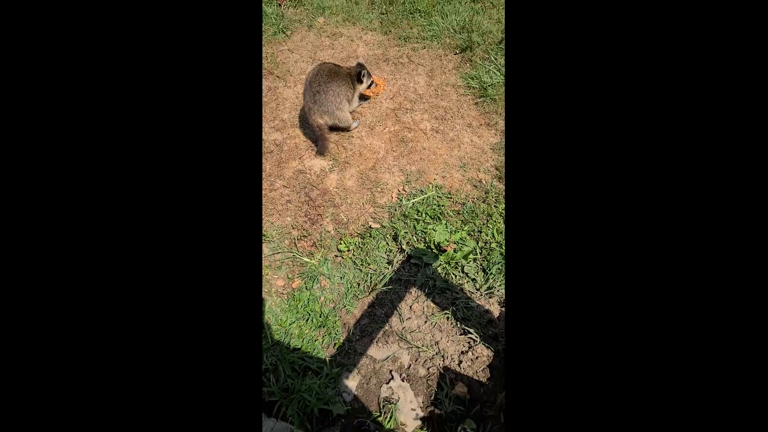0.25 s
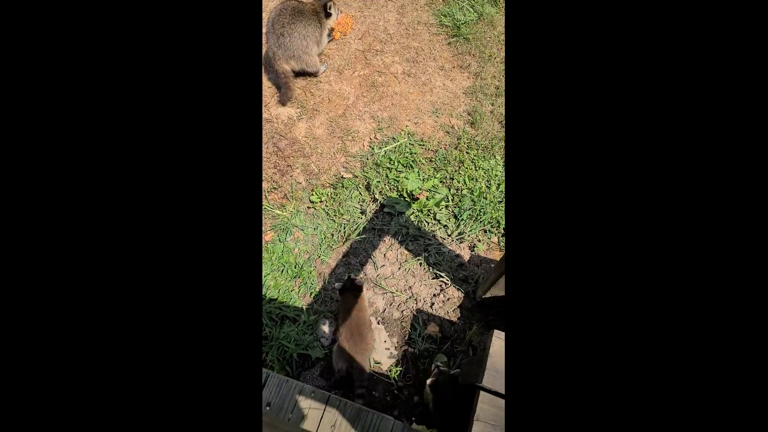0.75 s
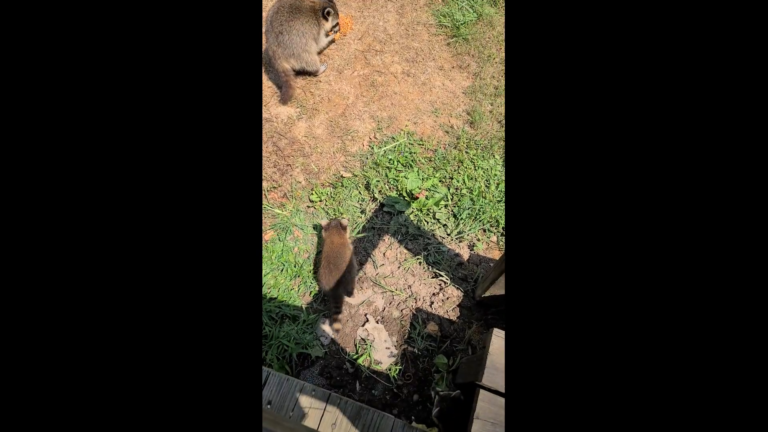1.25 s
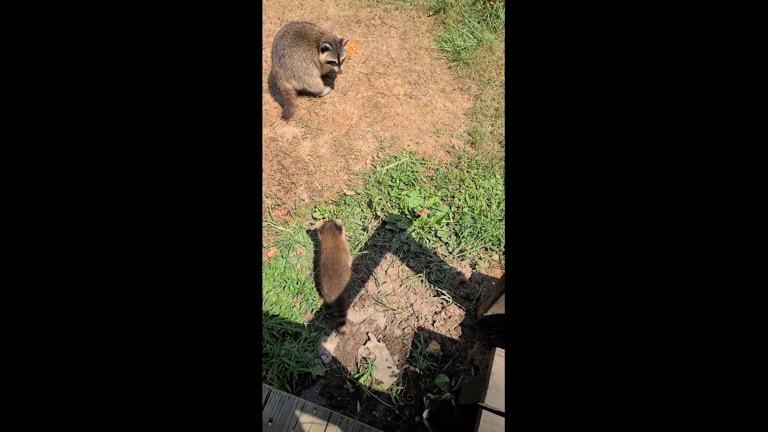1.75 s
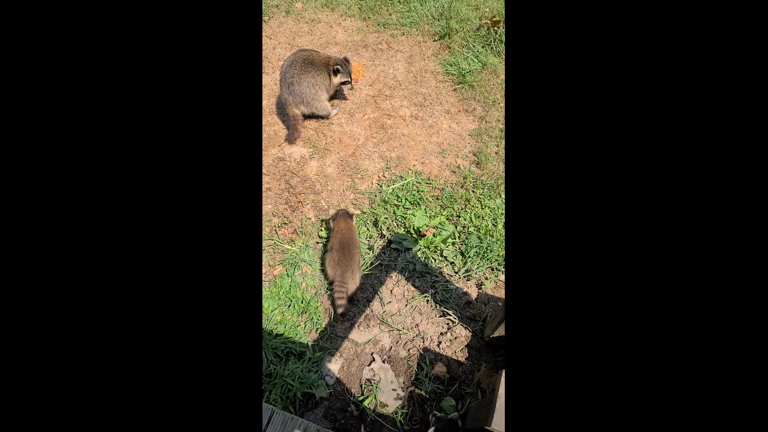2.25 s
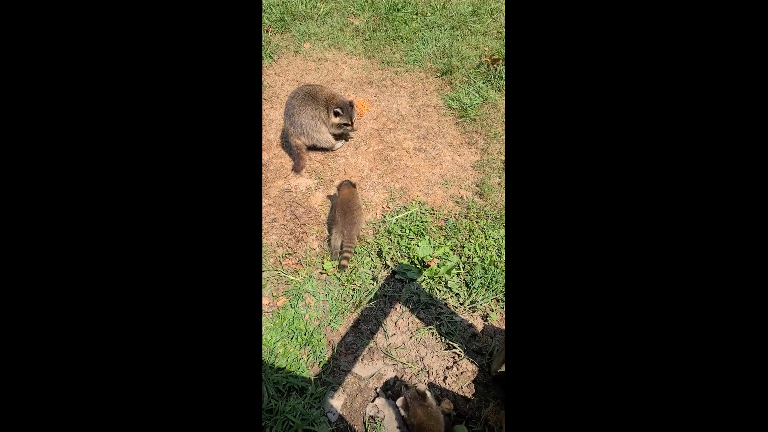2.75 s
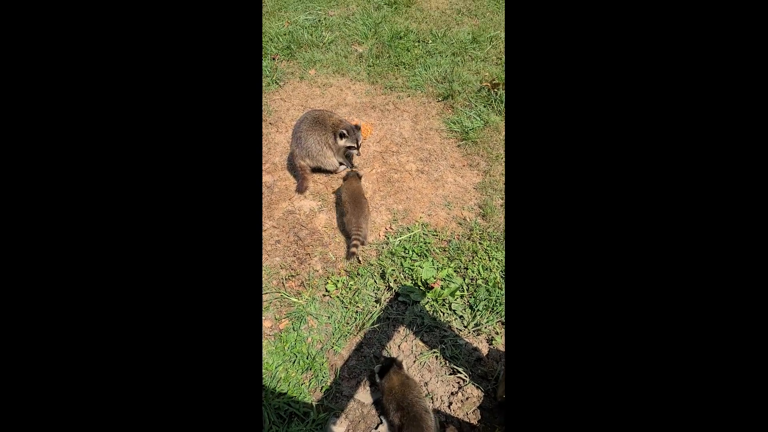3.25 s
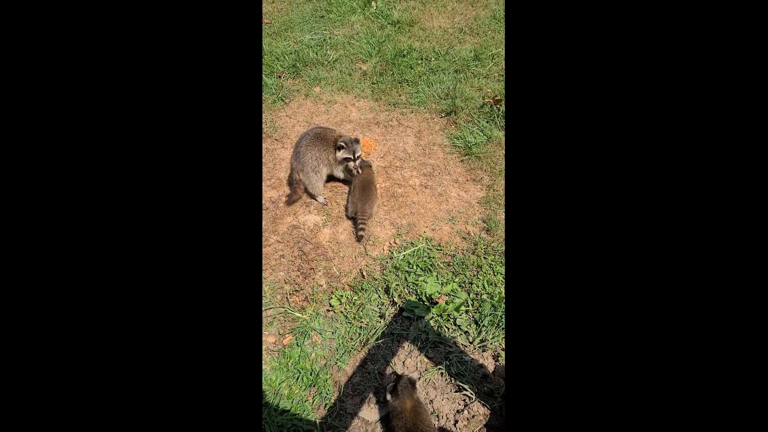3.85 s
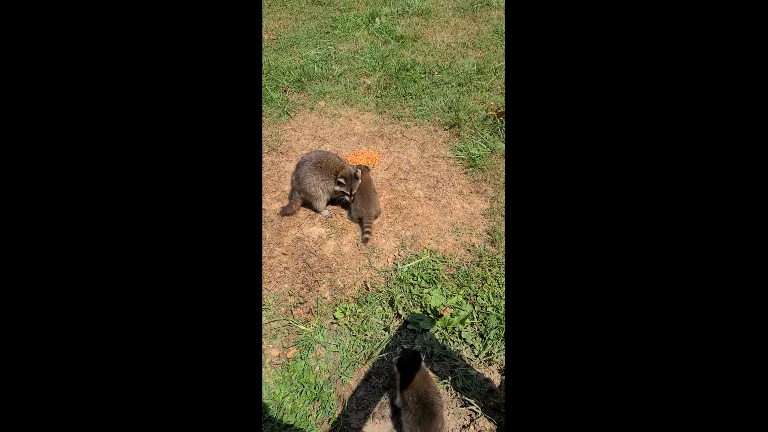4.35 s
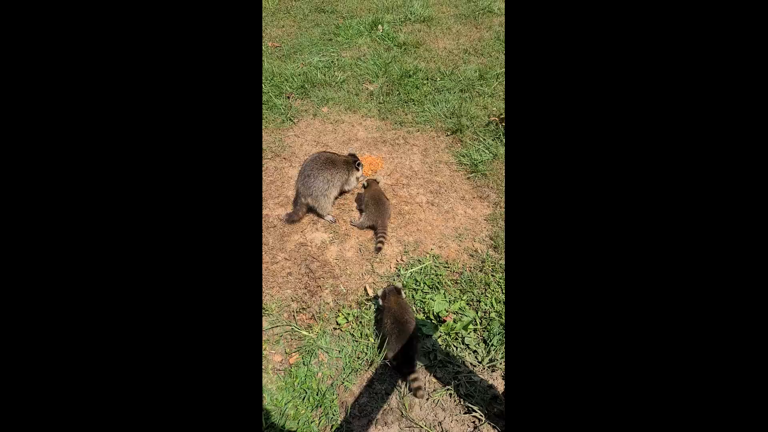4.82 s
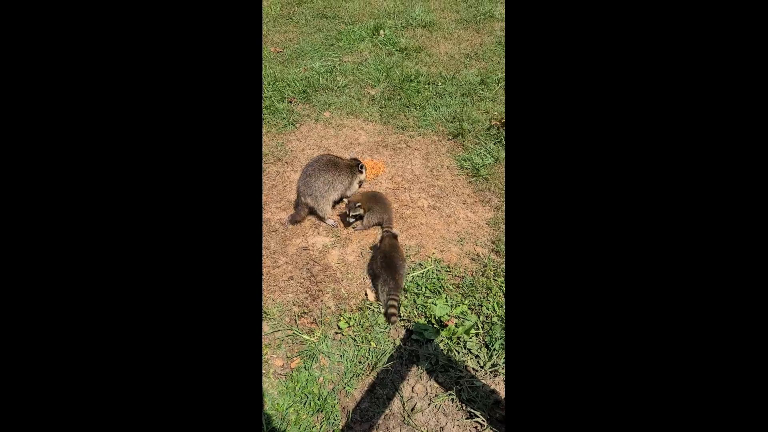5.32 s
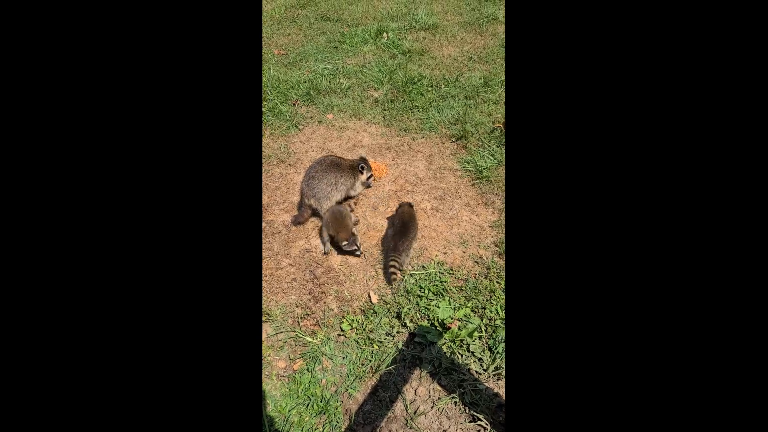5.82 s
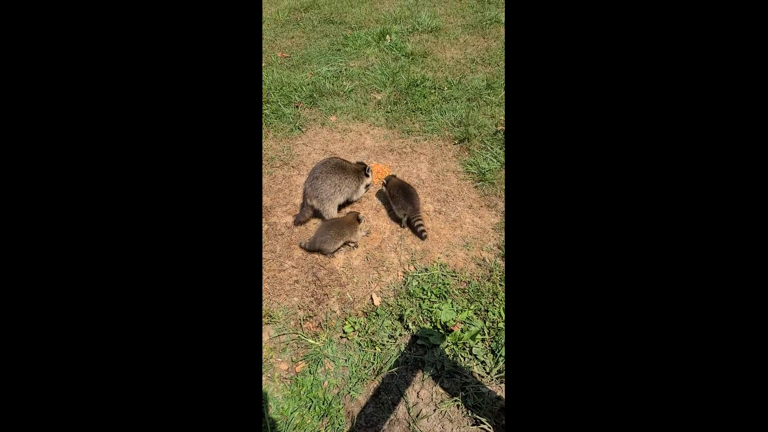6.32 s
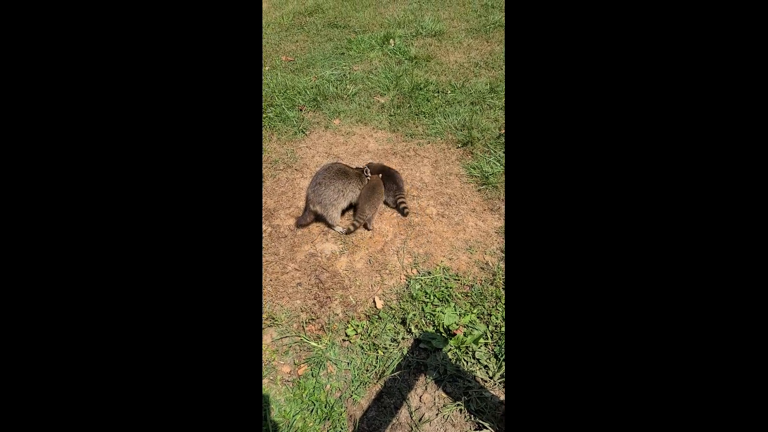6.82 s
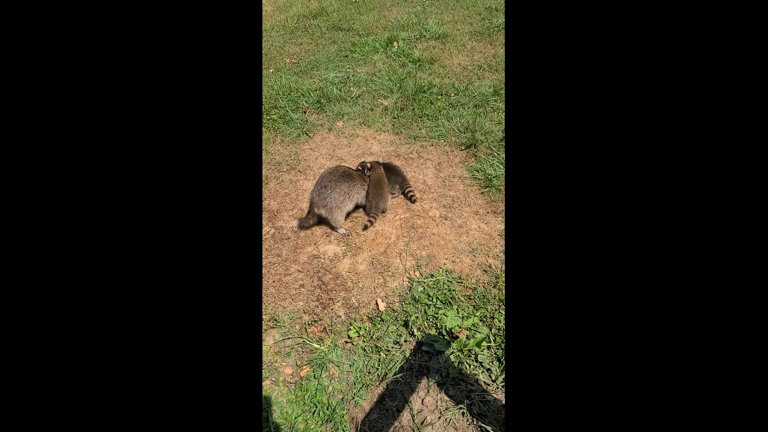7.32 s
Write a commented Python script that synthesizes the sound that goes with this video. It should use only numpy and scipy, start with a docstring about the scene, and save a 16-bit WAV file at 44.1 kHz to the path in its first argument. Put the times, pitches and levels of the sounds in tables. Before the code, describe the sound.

In an open yard, a young raccoon calls in a fast, buzzy trill of tiny squeaks, then a low, dry churr, then a second, longer trill. Sparse hoarse chucks and short squeaks follow. Low wind rumble buffets the handheld microphone throughout, heavier near the end. Faint bird notes, light grass crackles and paw scuffs sit behind, with a soft echo from trees.

```python
"""A lawn below a deck, among echoing trees: raccoon kits follow their mother past a camera.
Harmonic tones with bursts of filtered noise make their squeaks, in two long trills, short bouts or singly;
noise bursts in throat resonances make hoarse chucks. Grass crackles as grainy noise, birds whistle as gliding
sines, dull thuds and a pulsing insect buzz are shaped noise, and breeze noise rumbles on both ports."""
import sys
import numpy as np
from scipy import signal
from scipy.fft import rfft, irfft, next_fast_len
from scipy.io import wavfile
from scipy.ndimage import uniform_filter1d, map_coordinates

SR = 44100
rng = np.random.default_rng(int(sys.argv[2]) if len(sys.argv) > 2 else 0)


def store_pcm(level_fs):
    """Save levels as 16-bit WAV."""
    pcm = np.round(np.clip(level_fs, -1, 1) * 32767).astype(np.int16)
    wavfile.write(sys.argv[1], SR, np.atleast_2d(pcm).T)


N = 334278

# Levels are relative: later gains and filters act on them. Spreads are the sigma of a bell curve.
# rhythm of each trill: first_s, end_s, gap_s, slowing_per_s2, squeak_length_s
TRILL_RHYTHMS = [(0.6843, 1.55, .04362, .120, 0.0059), (3.4238, 4.5, .04408, .0415, 0.0077)]
# voice through each trill: time_s, pitch_hz, level_db, second_harmonic_db, third_harmonic_db,
# roughness (0-1), lead_in_db
TRILL_VOICES = [
    [(.685, 1120, -30.5, -23, -32, 0.83, -5.5), (.74, 1273, -25, -10, -28.5, .42, -7.5),
     (.9, 1273, -22.5, -8, -18, 0.08, -5), (1.04, 1341, -21.5, -7, -16.5, 0.12, -6),
     (1.085, 1397, -28, -11, -26, 0.57, -4.5), (1.13, 1289, -23, -5.5, -15.5, 0.45, -12),
     (1.225, 1248, -21.5, -4.5, -12.5, 0.4, -5), (1.31, 1225, -25, -8.5, -27, 0.77, -3.5),
     (1.39, 1056, -39, -19, -20, 0.5, -12), (1.525, 995, -32.5, -9, -22, 0.45, -10)],
    [(3.426, 1293, -28.5, -20, -32, 0.15, -17), (3.515, 1290, -25.5, -19, -30, .22, -7.5),
     (3.6, 1268, -24.5, -9, -18, 0.29, -7.5), (3.73, 1285, -22, -8.5, -17, 0.1, -13),
     (3.86, 1282, -24.5, -7, -16.5, 0.13, -8.5), (4.05, 1268, -21, -3, -14.5, 0.12, -14),
     (4.19, 1268, -20.5, -3.5, -15, .2, -16), (4.245, 1303, -21.5, -3.5, -16, 0.22, -1.5),
     (4.29, 1214, -27.5, -8, -28, 0.68, -9), (4.34, 1204, -25, -7, -24, 0.48, -7),
     (4.386, 1267, -19.5, -9, -25.5, 0.4, -16), (4.476, 1170, -32, -8.5, -35, 0.8, -6.5)],
]
# separately timed squeaks, single or in short bouts, one of them during the first trill:
# time_s, pitch_hz, level_db, second_harmonic_db, roughness (0-1)
TIMED_SQUEAKS = [(1.475, 1753, -28.5, -38, 0.1), (3.342, 1900, -23.5, -35.5, 0.07),
                 (5.566, 953, -31, -29, 0.33), (5.612, 1014, -27, -22, 0.28),
                 (5.657, 1050, -26.5, -11.5, 0.5), (5.707, 1043, -25, -16, 0.16),
                 (5.959, 1010, -33.5, -16, .3), (6.011, 1046, -28, -19.5, 0.2),
                 (6.51, 978, -37.5, -17, 0.15), (6.547, 1140, -41.5, -18, .25),
                 (6.592, 1146, -32.5, -9, 0.38), (6.846, 1047, -33, -28, 0.08)]
# colour of the squeaks' throat: frequency_hz, gain_db
THROAT_COLOUR = [(600, -20), (820, -14.5), (980, 0), (1200, -0.5), (1700, -6), (1950, -5), (2150, -3.5),
                 (2600, -2), (3100, -1.5), (3800, -2), (5100, -1.5), (6000, 6), (9000, 1.5)]
# random spread between trill squeaks: level in dB, pitch as a fraction, length as a log ratio
SCATTER_DB, SCATTER_PITCH, SCATTER_LENGTH = 0.86, 0.01187, 0.089
LEAD_S, TIMED_LENGTH_S = 0.015, 0.0059  # lead-in ahead of a squeak; base length of a timed squeak
THIRD_DROP_DB = 11.5  # a timed squeak's third harmonic under its second
# separately timed hoarse chucks, single, in short groups or leading into squeaks:
# time_s, main_resonance_hz, level_db, upper_level_db
SINGLE_TIMED_CHUCKS = [(0.633, 650, -49, -51), (0.754, 830, -41.5, -43.5), (1.355, 1080, -57, -49),
                       (1.405, 1080, -57, -51), (1.455, 1040, -52, -48), (1.575, 1620, -52, -55),
                       (2.849, 706, -43, -63), (2.887, 845, -43, -59.5), (2.927, 625, -43, -73),
                       (3.016, 1020, -53.5, -72), (3.325, 714, -44, -62), (3.359, 1430, -40.5, -62),
                       (3.401, 1220, -44.5, -47), (3.687, 630, -40, -52), (3.916, 530, -44.5, -57),
                       (4.491, 587, -47.5, -53), (4.537, 577, -41, -65), (4.774, 594, -47, -71),
                       (4.823, 780, -44, -55.5), (5.532, 676, -38, -68), (5.648, 640, -39, -67),
                       (5.698, 680, -40.5, -60), (5.739, 605, -42.5, -63), (5.921, 715, -40, -54),
                       (6.04, 630, -50.5, -65), (6.625, 746, -57, -70), (6.723, 825, -54, -72),
                       (6.806, 663, -43, -75), (6.895, 592, -47, -55), (7.558, 800, -45, -73)]
# rhythm of a run of chucks: first_s, end_s, gap_s, slowing_per_s2
CHURR_RHYTHM = (2.075, 2.5, .0385, .3)
# throat through that run: time_s, main_resonance_hz, level_db, upper_level_db
CHURR_RESONANCES = [(2.08, 650, -52.5, -55), (2.115, 920, -52.5, -51), (2.155, 1134, -34, -43),
                    (2.27, 1230, -36, -41), (2.31, 675, -40, -38), (2.35, 720, -43, -49.5),
                    (2.48, 657, -39, -47)]
# direction of the calling kit: time_s, left_minus_right_db, left_lead_ms
KIT_DIRECTION = [(.7, 5, 0.14), (1.3, 4, 0.14), (1.5, 0.5, 0.14), (2.4, 3, 0.13), (3.5, 4, -0.079),
                 (3.9, 2, -0.055), (4.2, 1, -0.069), (4.45, 5.5, -0.053), (5.7, 3, 0.13), (6.8, 1.5, 0.17)]
# extra level difference between the ports: frequency_hz, left_minus_right_db
PORT_SHADOW = [(600, -4), (1300, -0.5), (2600, 6), (3900, 41), (7000, 30.5)]
# reverberation from the trees: frequency_hz, t60_s
TREE_DECAY = [(500, 0.24), (3000, 0.57), (8000, 1)]
# reverberation from the deck: frequency_hz, t60_s
DECK_DECAY = [(300, 0.31), (1500, 0.055), (8000, 0.13)]
# bird notes: start_s, length_s, first_hz, held_hz, slide_time_constant_s, level_db, swell_db
BIRD_NOTES = [(1.604, 0.045, 3050, 3020, .02, -46, 2), (1.645, 0.026, 2476, 2390, .02, -46.5, 2),
              (1.684, 0.073, 2320, 1946, .006, -47, 0), (1.695, 0.18, 2465, 2445, .03, -56, -6),
              (1.764, 0.11, 2990, 2950, .04, -49, -10), (1.748, .13, 5060, 5960, .03, -67, -3),
              (1.778, .19, 7560, 7870, .03, -66.5, 5), (1.789, .15, 8600, 8900, .07, -66.5, 3),
              (1.992, 0.27, 7150, 6760, .015, -68, 0), (2.123, 0.1, 5250, 6080, .018, -63, -4),
              (2.16, 0.097, 7700, 8100, .06, -65, 5), (4.44, .14, 7650, 8150, .08, -61, 1),
              (4.449, 0.44, 6530, 6030, .12, -70, -6), (4.745, .1, 7600, 8200, .06, -68, 3),
              (6.255, 0.117, 3900, 3790, .06, -51.5, 12), (6.37, 0.145, 3790, 3785, 0.047, -59, 0),
              (6.36, .26, 3650, 2148, 0.014, -52, -13), (6.529, 0.3, 3520, 3410, .04, -52, 1)]
# one throbbing bird note: length_s, first_hz, held_hz, slide_time_constant_s, level_db, swell_db
THROBBING_NOTE = (0.21, 2848, 2989.5, 0.1, -43.5, -3)
THROB_START_S, THROB_HZ = 6.55, 24.5
# bodies brushing through grass: time_s, level_db, spread_s
GRASS_BRUSHES = [(.23, -63.5, 0.065), (1.0, -64, 0.072), (1.22, -73, 0.059), (2.28, -62.5, 0.017),
                 (2.7, -72, 0.33), (3.9, -69, 0.22), (4.48, -63, 0.055), (4.86, -64.5, 0.082),
                 (5.385, -58, 0.016), (5.71, -62, 0.072), (5.97, -63, 0.036), (6.7, -74, .4)]
# dry stalks snapping: time_s, level_db
STALK_SNAPS = [(0.2389, -50), (0.2708, -51), (1.068, -52), (2.483, -49.5), (2.6125, -54), (3.685, -45),
               (3.7354, -45), (4.4488, -55), (5.3692, -51), (5.7022, -46), (5.742, -43), (5.8336, -51),
               (5.9504, -49)]
# paws scraping dirt: time_s, level_db, spread_s
DIRT_SCUFFS = [(.25, -59.5, 0.046), (4.903, -52.5, 0.029)]
# spectrum of dry stalks: frequency_hz, density_db_per_hz
STALK_SPECTRUM = [(800, -34), (2500, -7), (5000, 3), (7000, -5), (8500, 4), (11000, -1.5), (15500, -2)]
# spectrum of scraped dirt: frequency_hz, density_db_per_hz
DIRT_SPECTRUM = [(300, -2.5), (900, -4), (2000, -5), (3200, 0), (4500, -15.5), (8000, -21), (15000, -19)]
# dull thuds: time_s, level_db, spread_s
THUD_TIMES = [(2.01, -48, 0.02), (2.26, -52, 0.022), (2.45, -56, 0.044)]
# spectrum of a thud: frequency_hz, density_db_per_hz
THUD_SPECTRUM = [(120, -20), (230, -3), (380, 3.5), (520, -14), (900, -42)]
# spectrum of the insects: frequency_hz, density_db_per_hz
INSECT_SPECTRUM = [(7500, -40), (9000, -8.5), (9500, -12.0), (11000, -32.0)]
# breeze on each port: time_s, left_db, right_db
BREEZE_LEVELS = [(0, -35, -30), (.35, -37, -33.5), (.7, -43, -48), (.85, -44, -41), (1.2, -46, -53.5),
                 (1.45, -37, -43), (1.8, -39, -44.5), (2.5, -39, -32.5), (2.85, -42, -32.5),
                 (3.2, -35, -29), (3.4, -40.5, -41.5), (3.7, -38.5, -32.5), (4.55, -39, -32.5),
                 (4.8, -42, -46), (5.1, -39, -48), (5.45, -35, -30.5), (5.7, -38, -36.5), (6.3, -29, -26.5),
                 (6.65, -42, -32), (7.18, -46.5, -37.5), (7.58, -35, -38)]
# eddies that hit the ports: time_s, spread_s, buffet_db, flutter_db, left_minus_right_db
PORT_EDDIES = [(1.426, .02, -37, -45.5, 4), (2.01, 0.032, -34.5, -43.5, -17), (2.246, 0.037, -38, -43, 2),
               (2.461, 0.051, -32.5, -47, 3), (2.625, .04, -32.5, -52.5, -14),
               (3.675, 0.041, -35.5, -45, -13), (3.992, 0.019, -23, -45, 0), (4.152, .06, -44, -37, -15),
               (4.382, 0.037, -26, -50, -10.5), (5.236, 0.032, -28.5, -63, 5), (5.43, 0.051, -37, -58, -15),
               (5.854, 0.034, -19.5, -45, -1.5), (6.109, 0.034, -20.5, -60, -1),
               (6.252, 0.015, -22.5, -48, 6), (6.36, 0.015, -20, -47, -2.5), (6.738, 0.025, -29, -53, -3),
               (6.514, 0.015, -28, -56, 1), (7.335, 0.033, -21, -39.5, 0), (7.46, 0.058, -28.5, -55, -9)]
# spectrum of the low buffeting: frequency_hz, density_db_per_hz
BUFFET_SPECTRUM = [(12, -56), (22, -10.5), (35, -2.5), (52, 0), (68, 4), (85, -3), (105, -9), (150, -22),
                   (260, -39.5), (440, -110)]
# spectrum of the flutter above it: frequency_hz, density_db_per_hz
FLUTTER_SPECTRUM = [(60, -48), (100, 1.5), (130, -8), (200, -6), (280, -17), (360, -17.5), (470, -30),
                    (900, -34.5), (2000, -94)]
# spectrum of the distant air: frequency_hz, density_db_per_hz
YARD_SPECTRUM = [(150, -17), (250, -1), (303, -6.5), (366, -2), (509, -11.5), (565, -7), (696, -9.5),
                 (759, -13.5), (887, -13.5), (1190, -11.5), (2940, -14), (3430, -15), (7240, -23),
                 (9230, -22.5), (15800, -23.5)]
# mean flutter level when the breeze is at CALM_DB; its rise in dB per dB of breeze
FLUTTER_DB, CALM_DB, FLUTTER_GROWS = -60, -42, 0.22
TOP_HZ = 15850  # upper band limit of the camera


def kits():
    """Localisation: level and arrival differences place the voice; the camera's body shades the right port."""
    voice = trill() + chucks()
    pan_db, lead_ms = curves(KIT_DIRECTION)
    half_lead = lead_ms / 1000 * SR / 2  # in samples
    n = np.arange(N)
    left = map_coordinates(voice, [n + half_lead])
    right = map_coordinates(voice, [n - half_lead])
    placed = np.array([left, right]) * sides(pan_db)
    direct = filtered(placed, lambda hz: sides(along(PORT_SHADOW, hz)))
    # as the kits walk, the pattern of near reflections keeps changing
    turn = 2 * np.pi * 0.42 * n / SR
    near = echo(voice * np.cos(turn), DECK_DECAY, gap=0.002987)
    near = near + echo(voice * np.sin(turn), DECK_DECAY, gap=0.00302)
    far = echo(voice, TREE_DECAY, gap=0.02)
    return direct + amp(-11.5) * near * sides(0.35) + amp(-21) * far


def trill():
    """Source and filter: runs of varied squeaks, and separately timed ones, pass through one throat colour."""
    out = np.zeros(N)
    for (first, end, gap, slowing, length), voice in zip(TRILL_RHYTHMS, TRILL_VOICES):
        for s in beats(first, end, gap, slowing):
            hz, db, *colour = at_time(voice, s)
            longer, higher, louder = rng.standard_normal(3)
            varied_length = length * np.exp(SCATTER_LENGTH * longer)
            varied_hz = hz * (1 + SCATTER_PITCH * higher)
            add(out, s, squeak(varied_length, varied_hz, db + SCATTER_DB * louder, *colour))
    for s, hz, db, second_db, rough in TIMED_SQUEAKS:
        third_db = second_db - THIRD_DROP_DB
        add(out, s, squeak(TIMED_LENGTH_S, hz, db, second_db, third_db, rough, lead_db=-12.5))
    return filtered(out, lambda hz: amp(along(THROAT_COLOUR, hz)))


def squeak(length, hz, db, second_db, third_db, rough, lead_db):
    """Phonation: a lower lead-in, then harmonics on an arching pitch, with resonant noise for hoarseness."""
    t = np.arange(-SR // 25, SR // 25) / SR
    length = length * (1 + 0.4 * rough)  # hoarse squeaks drag on, and so do their lead-ins
    burst = swell(t, 0.51 * length, 0.4 * length)
    lead_in = amp(lead_db - 2) * swell(t + LEAD_S, 0.00096 + 0.0082 * rough, 0.0067)
    onset = burst + 0.5 * lead_in

    arch = 0.82 + 0.19 * swell(t - 0.001, 0.011, 0.012)
    jitter = (0.024 + 0.08 * rough ** 2) * wobble(650, size=len(t))
    phase = 2 * np.pi * np.cumsum(hz * arch * (1 + jitter)) / SR
    # levels of harmonics 2 to 6: a stronger third lifts those above it
    overtones = [second_db, third_db, 2.36 * third_db + 3, 1.22 * third_db - 26, 1.8 * third_db - 27]
    tone = onset * np.sin(phase)
    for k, level in enumerate(overtones, 2):
        flicker = amp(level + 0.91 * wobble(310, size=len(t)))
        tone += flicker * burst ** 1.1 * np.sin(k * phase + rng.uniform(0, 2 * np.pi))
    # roughness makes the tone weaker and less steady
    tone *= np.sqrt(2) * amp(4.0 * rough * wobble(462, size=len(t)) - 13.5 * rough)

    # hoarse noise lingers after the squeak
    breaking = onset + 0.23 * swell(t - 0.006, 0.0017, 0.0061)
    hoarse = rasp(breaking, 0.89 * hz, 960)
    hoarse = hoarse + amp(second_db) * rasp(breaking, 2310, 880)
    hoarse = hoarse + amp(third_db) * rasp(breaking, 3870, 2040)
    edge = amp(2 * third_db + 12) * rasp(breaking, 4830, 500)  # thin, strongest in hard squeaks
    hiss = amp(-46.5) * rasp(breaking, 10400, 9800)
    chest = amp(-5.5) * (0.1 + rough) * rasp(breaking, 480, 490)
    start = 0.43 * rasp(lead_in, 0.835 * hz, 250)
    start = start + amp(second_db - 9) * rasp(lead_in, 2440, 1040)
    start = start + 0.84 * rough * rasp(lead_in, 1460, 630)
    return amp(db) * (tone + (0.053 + 0.65 * rough) * (hoarse + edge) + start + hiss + chest)


def chucks():
    """Resonance: noise pulses, timed one by one or in a churr, ring in throat bands, broader when higher."""
    out = np.zeros(N)
    t = np.arange(-SR // 25, SR // 25) / SR
    churr = [(s, *at_time(CHURR_RESONANCES, s)) for s in beats(*CHURR_RHYTHM)]
    for s, hz, db, upper_db in churr + list(SINGLE_TIMED_CHUCKS):
        burst = swell(t + 0.00024, 0.0036, 0.0056)
        slower_burst = swell(t, 0.01, 0.0062)
        body = rasp(burst, hz, 0.39 * hz) + amp(-11.5) * rasp(slower_burst, 740, 780)
        upper = rasp(burst, 1650, 630) + amp(-28.0) * rasp(burst, 3900, 2000)
        add(out, s, amp(db) * body + amp(upper_db) * upper)
    return out


def rasp(envelope, hz, width_hz):
    """Band-pass resonance: a noise puff in one steep throat band, with the energy of its envelope."""
    f = np.fft.rfftfreq(len(envelope), 1 / SR)
    band = 1 / (1 + ((f * f - hz * hz) / (f * width_hz + 1)) ** 4)
    puff = envelope * irfft(rfft(rng.standard_normal(len(envelope))) * band, len(envelope))
    return puff * np.linalg.norm(envelope) / np.linalg.norm(puff)


def beats(first, end, gap, slowing):
    """Breath rhythm: times of a run of calls that slows as the kit runs out of air."""
    steady = np.arange(0, 2, gap)
    times = first + steady * (1 + slowing * steady ** 2)
    return times[times < end]


def birds():
    """Reverberation: whistles reach the ports directly and as a strong echo among the trees."""
    song = np.zeros(N)
    for s, length, *shape in BIRD_NOTES:
        add(song, s + length / 2, whistle(length, *shape))
    note = whistle(*THROBBING_NOTE)
    t = np.arange(len(note)) / SR
    throb = np.sin(np.pi * THROB_HZ * (t + 0.008)) ** 4
    add(song, THROB_START_S + THROBBING_NOTE[0] / 2, note * throb)
    return amp(-4.5) * song * sides(8.9) + amp(-3) * echo(song, TREE_DECAY, gap=0.016) * sides(4.5)


def whistle(length, first_hz, held_hz, slide, db, swell_db):
    """Frequency modulation: one slightly unsteady sine glides exponentially towards its held pitch."""
    t = np.arange(int(length * SR)) / SR
    glide = held_hz + (first_hz - held_hz) * np.exp(-t / slide)
    hz = glide * (1 + 0.0082 * wobble(136.5, size=len(t)))
    gate = np.clip(np.minimum(t, length - t) / 0.0037, 0, 1)
    level = amp(db + swell_db * (t / length - 0.5))
    return gate * level * np.sin(2 * np.pi * np.cumsum(hz) / SR)


def paws():
    """Friction and fracture: grass rustles in tiny grains, stalks snap and paws scrape the dirt."""
    grain = unit(amp(4.2 * wobble(500) + 2.5 * wobble(30)))
    snaps = np.zeros(N)
    t = np.arange(-SR // 100, SR // 100) / SR
    for s, db in STALK_SNAPS:
        add(snaps, s, amp(db - 7) * swell(t - 0.001, 0.0003, 0.0014))
    grass = (strokes(GRASS_BRUSHES) * grain + snaps) * noise(STALK_SPECTRUM, pan_db=17.5)
    scrape = strokes(DIRT_SCUFFS) * amp(3.0 * wobble(200))
    return grass + scrape * noise(DIRT_SPECTRUM, pan_db=2)


def thuds():
    """Impact: bell-shaped swells of low noise make a few soft, dull thuds near the camera."""
    return strokes(THUD_TIMES) * noise(THUD_SPECTRUM, pan_db=-2)


def insects():
    """Amplitude modulation: a soft band of high noise pulses 4.7 times a second from the lawn."""
    t = np.arange(N) / SR
    pulse = amp(-78.5 + 2.5 * np.sin(2 * np.pi * 4.7 * t))
    return pulse * noise(INSECT_SPECTRUM, pan_db=7)


def breeze():
    """Turbulence: wind buffets each port on its own, flutters more as it grows and adds single eddies."""
    t, port_db = np.arange(N) / SR, np.array(curves(BREEZE_LEVELS))
    buffet = amp(port_db + 2.77 * np.array([wobble(10), wobble(11)]))
    flutter_db = FLUTTER_DB + FLUTTER_GROWS * (port_db - CALM_DB)
    flutter = amp(flutter_db + 3.2 * np.array([wobble(14), wobble(14)]))
    for s, spread, eddy_buffet_db, eddy_flutter_db, pan_db in PORT_EDDIES:
        eddy = swell(t - s, spread, spread) * sides(pan_db)
        # unrelated sounds add in power
        buffet = np.hypot(buffet, amp(eddy_buffet_db) * eddy)
        flutter = np.hypot(flutter, amp(eddy_flutter_db) * eddy)
    wind = buffet * steadied(noise(BUFFET_SPECTRUM, pan_db=0), 0.041)
    wind = wind + flutter * steadied(noise(FLUTTER_SPECTRUM, pan_db=0), 0.04)
    # the yard's air lies under the wind; its low distant part reaches both ports alike
    shared = filtered(noise(YARD_SPECTRUM, pan_db=2.5)[0], lambda hz: 1 / (1 + (hz / 1800) ** 2))
    return wind + amp(-61) * noise(YARD_SPECTRUM, pan_db=3.0) + amp(-62) * shared


def steadied(x, seconds):
    """Envelope normalisation: noise with its own slow swells evened out."""
    power = np.abs(signal.hilbert(x, next_fast_len(N))[..., :N]) ** 2 / 2
    return x / np.sqrt(np.abs(uniform_filter1d(power, int(seconds * SR))) + 1e-6)


def echo(x, decay, gap):
    """Diffuse reverberation: stereo reflections start after gap seconds and decay at each frequency's t60."""
    hz, t, z = signal.stft(rng.standard_normal((2, SR)), SR, nperseg=256)
    fading = z * amp(-60 * t / along(decay, hz)[:, None])
    tail = signal.istft(fading, SR, nperseg=256)[1]
    delayed = np.pad(x, (int(gap * SR), 0))[None]
    return signal.fftconvolve(delayed, tail / np.linalg.norm(tail[0]), axes=1)[:, :N]


def noise(spectrum, pan_db):
    """Incoherence: shaped noise of overall rms 1, unrelated left and right."""
    white = rng.standard_normal((2, N))
    return unit(filtered(white, lambda hz: amp(along(spectrum, hz)))) * sides(pan_db)


def sides(pan_db):
    """Level panning: left and right gains for a difference in dB, at constant total power."""
    gain = amp(np.array([pan_db, -pan_db]) / 2).reshape(2, -1)
    return gain / np.sqrt(np.mean(gain ** 2, axis=0))


def filtered(x, response):
    """Linear filtering: the spectrum of x times a response of frequency in Hz."""
    m = next_fast_len(N + SR // 2)
    return irfft(rfft(x, m) * response(np.fft.rfftfreq(m, 1 / SR)), m)[..., :N]


def strokes(rows):
    """Superposition: summed bell-shaped swells from (time_s, level_db, spread_s) rows."""
    t = np.arange(N) / SR
    return sum(amp(db) * swell(t - s, spread, spread) for s, db, spread in rows)


def swell(t, rise, fall):
    """Gaussian envelope: a bell with its own rise and fall spreads in seconds."""
    return np.exp(-(t / np.where(t < 0, rise, fall)) ** 2 / 2)


def wobble(rate, size=N):
    """Random modulation: a smooth curve through random knots, rate knots a second."""
    knots = rng.standard_normal(int(size * rate / SR) + 4)
    return map_coordinates(knots, [np.arange(size) * rate / SR])


def add(track, s, sound):
    """Superposition: lay a sound on the track, centred on s seconds."""
    at = round(s * SR) - len(sound) // 2 + np.arange(len(sound))
    inside = (at >= 0) & (at < N)
    track[at[inside]] += sound[inside]


def at_time(rows, s):
    """Interpolation: the columns of a curve at one moment."""
    times, *cols = np.transpose(rows)
    return [np.interp(s, times, c) for c in cols]


def curves(rows):
    """Interpolation: one value per sample for each column after the time."""
    return at_time(rows, np.arange(N) / SR)


def along(points, hz):
    """Logarithmic frequency: interpolate (frequency_hz, value) points on a log axis."""
    f, v = np.transpose(points)
    return np.interp(np.log(hz + 1), np.log(f + 1), v)


def unit(x):
    """Normalisation: scale to rms 1."""
    return x / np.sqrt(np.mean(np.abs(x) ** 2) + 1e-20)


def amp(db):
    """Decibel law: level in dB to amplitude gain."""
    return 10 ** (np.asarray(db) / 20)


def scene():
    """Superposition: every source in the yard adds linearly."""
    return kits() + birds() + paws() + thuds() + insects() + breeze()


def record(dry):
    """Band limiting: the camera keeps nothing from TOP_HZ upward."""
    return filtered(dry, lambda hz: hz < TOP_HZ)


dry = scene()
out = record(dry)
store_pcm(out)
```